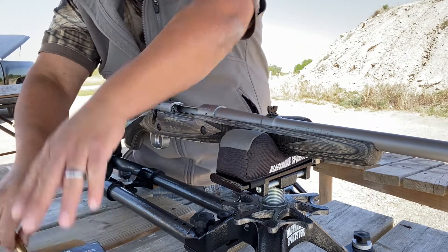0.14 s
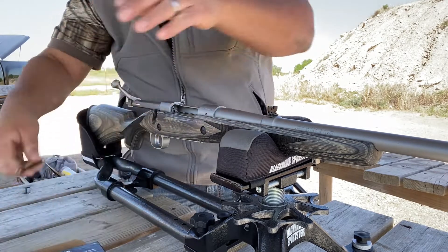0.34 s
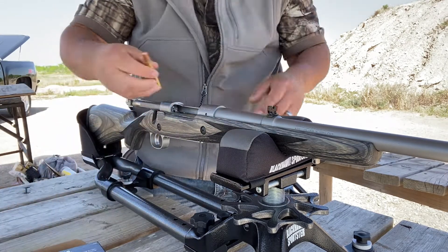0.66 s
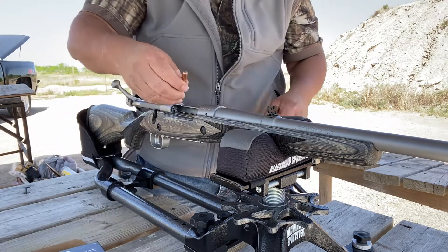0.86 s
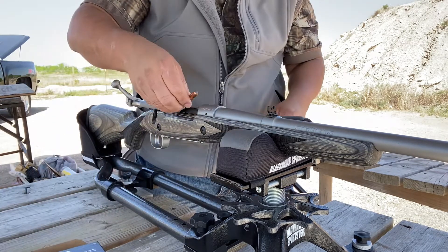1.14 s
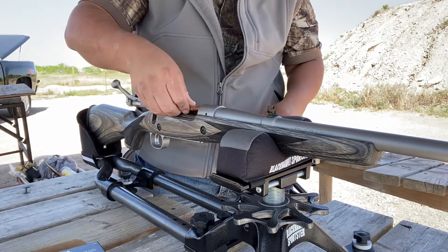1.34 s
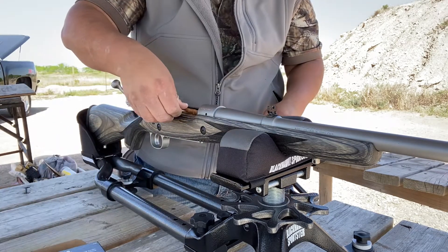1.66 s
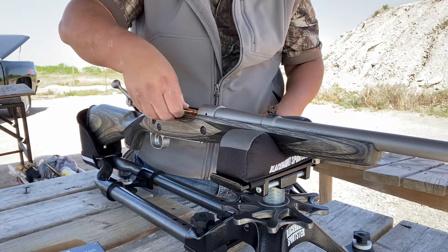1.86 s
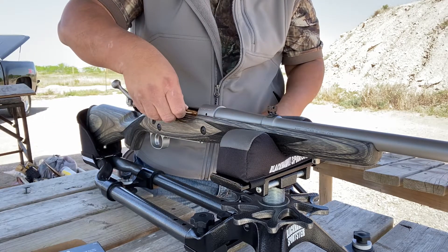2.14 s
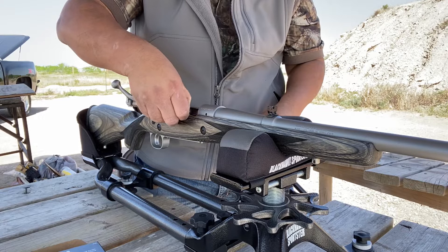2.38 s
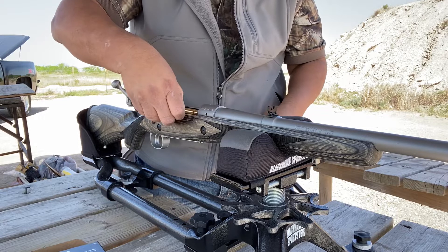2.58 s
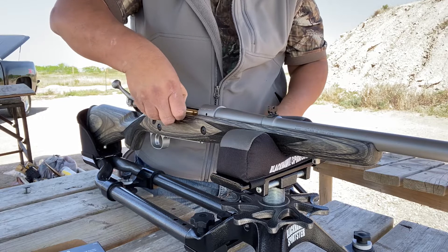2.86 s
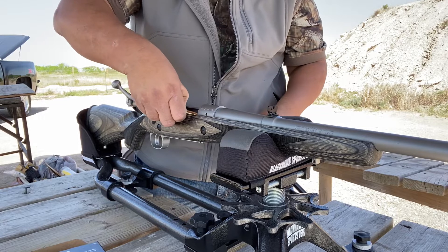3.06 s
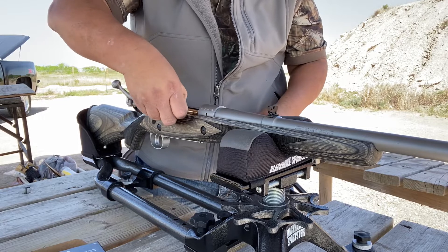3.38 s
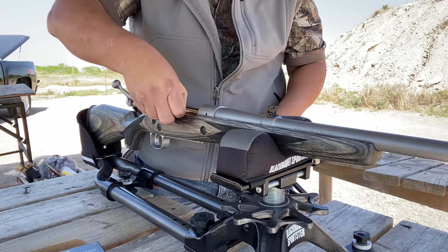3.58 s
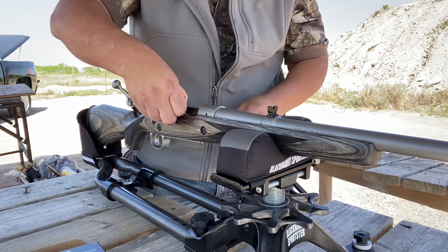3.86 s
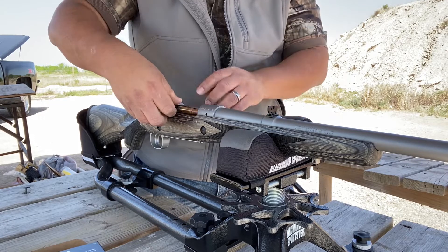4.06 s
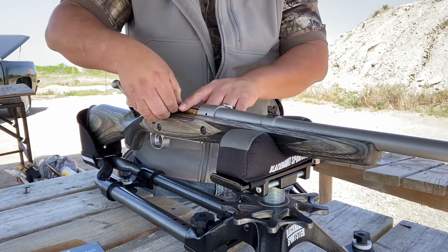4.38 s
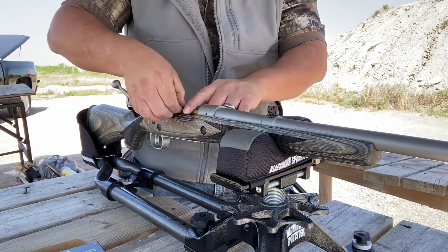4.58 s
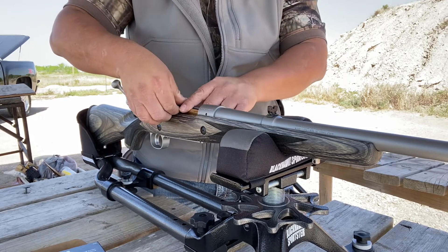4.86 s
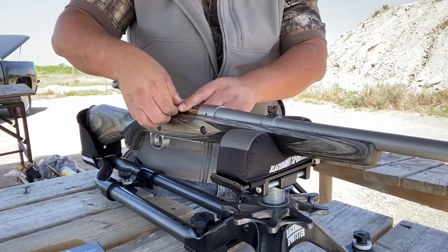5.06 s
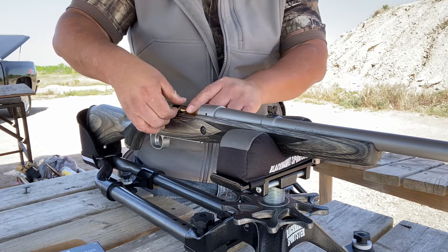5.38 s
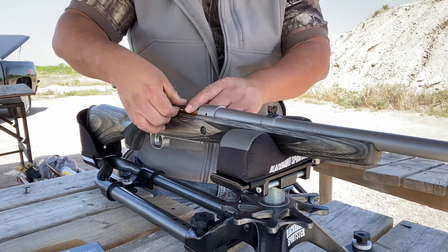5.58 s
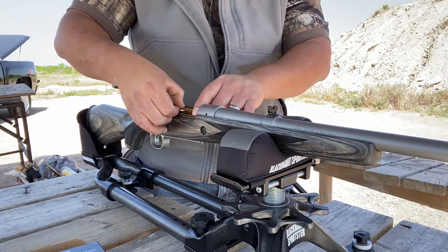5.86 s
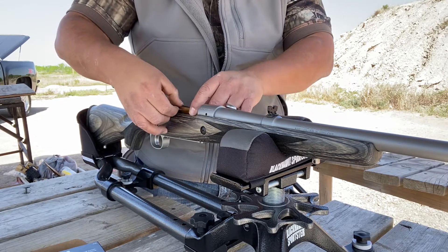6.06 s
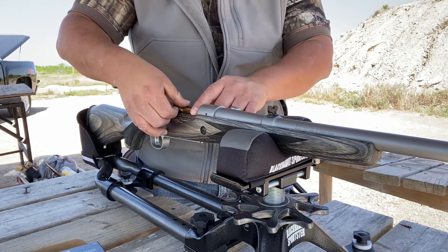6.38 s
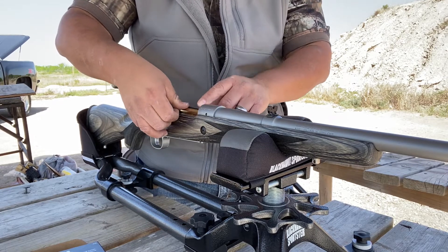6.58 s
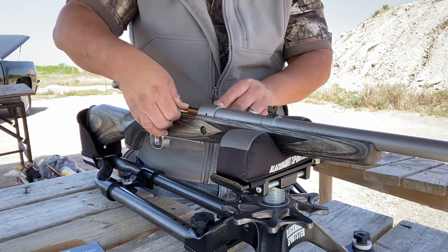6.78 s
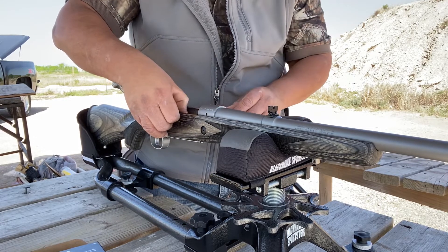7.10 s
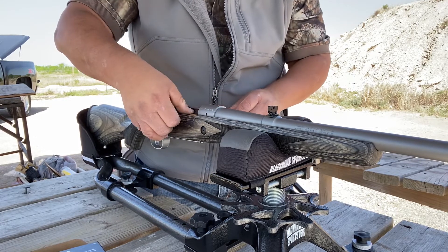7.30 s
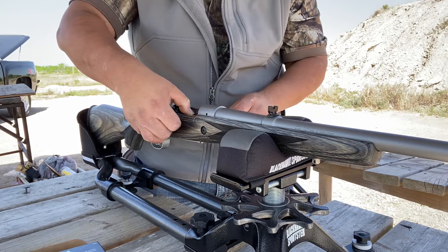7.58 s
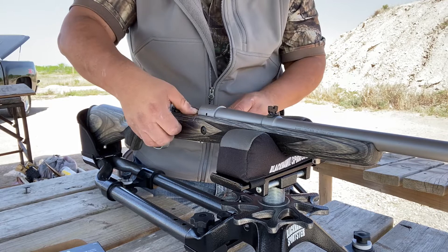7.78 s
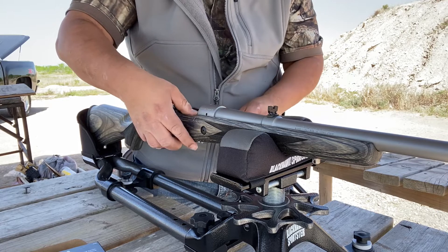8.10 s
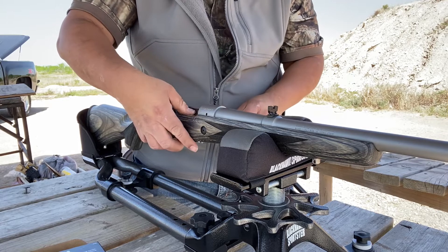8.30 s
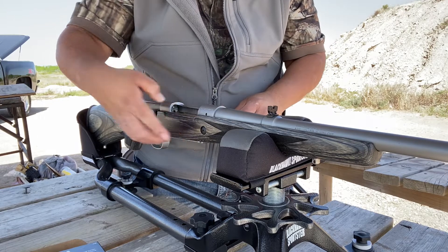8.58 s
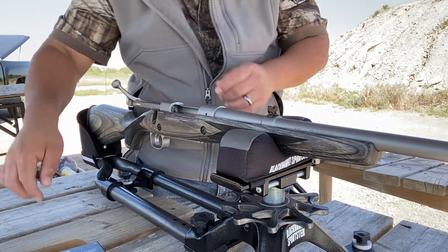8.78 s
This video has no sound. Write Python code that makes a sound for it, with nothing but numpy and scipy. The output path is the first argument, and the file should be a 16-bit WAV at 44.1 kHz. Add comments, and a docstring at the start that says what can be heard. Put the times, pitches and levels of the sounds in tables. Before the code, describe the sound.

Outdoors, close stereo microphone, dry with only a slight scattered reflection. At 0 s a low puff of wind rasps as a light, dull knock lands, followed by faint cloth rubbing. From 1.1 to 1.5 s brass clatters on steel in a quick run of bright clicks, briefly ringing, with short scrapes. A very faint distant bird whistle falls twice near 1.8 s. A strong wind thump and a sharp snap come at 2.3 s, then a double click at 2.55 s. Small ticks at 3.3 s lead to a hard snap at 3.8 s and the loudest clack at 4.0 s, trailing brassy rattles until 4.35 s. From 4.5 to 6.8 s, sparse light ticks and scuffs. Firmer clicks at 6.9 and 7.7 s, a softer tick at 8.03 s, then faint rubbing. Lumpy low wind and faint hiss continue throughout.

```python
"""A puff of wind and a light knock come first; then brass cartridges are pressed into the steel magazine
of a rifle lying in a rest on a wooden bench, outdoors. Each contact is a burst of shaped noise with
decaying sines for action, stock and brass; scrapes and scuffs are filtered noise.
Wind is lumpy low noise with sagging sine puffs on the microphone's two ports; the open country is a faint
hiss, and a far bird is one gliding sine."""
import sys
import numpy as np
from scipy import signal
from scipy.fft import rfft, irfft, next_fast_len
from scipy.io import wavfile
from scipy.ndimage import uniform_filter1d, map_coordinates

SR = 44100
rng = np.random.default_rng(int(sys.argv[2]) if len(sys.argv) > 2 else 0)


def convert_level_to_amplitude(level_db):
    """Map a level in decibels to its linear amplitude factor."""
    exponent = np.asarray(level_db, float) / 20
    return 10 ** exponent


def unload_audio(sound):
    """Save the sound as a 16-bit wav file, at the path given as the first command line argument."""
    columns = np.transpose(np.atleast_2d(sound))
    # keep every value between -1 and 1, then stretch to whole-number steps
    steps = np.round(np.clip(columns, -1, 1) * 32767)
    wavfile.write(sys.argv[1], SR, steps.astype(np.int16))


N = 394254

# modes of the steel action and magazine: pitch_hz, level_db, t60_s
ACTION_MODES = [(1350, -3, .03), (1580, -6, .035), (1775, -3, .035), (2000, -2, .04), (2200, -4, .035),
                (2330, -6, .03), (2700, -6, .025), (3000, -7, .025), (3700, -4, .025), (3950, -4, .022),
                (4400, -6, .022), (5500, -9, .02), (6400, -10, .02)]
# modes of the stock and bench under a blow: pitch_hz, level_db, t60_s
STOCK_MODES = [(840, -3, .03), (1180, -.5, .035)]


def unit(x):
    """Scaled to rms 1."""
    return x / np.sqrt(np.mean(x ** 2) + 1e-20)


def along(points, hz):
    """Interpolates (Hz, value) points on a log frequency axis."""
    f, v = np.transpose(points)
    return np.interp(np.log(hz + 1), np.log(f + 1), v)


def curves(rows):
    """One value per sample for each column after the time."""
    s, *cols = np.transpose(rows)
    return [np.interp(np.arange(N) / SR, s, c) for c in cols]


def wobble(rate):
    """A smooth random curve with rate knots a second."""
    knots = rng.standard_normal(int(N * rate / SR) + 4)
    return map_coordinates(knots, [np.arange(N) * rate / SR])


def filtered(x, response):
    """x times a complex response of frequency."""
    n = x.shape[-1]
    m = next_fast_len(n + 8192)
    return irfft(rfft(x, m) * response(np.fft.rfftfreq(m, 1 / SR)), m)[..., :n]


def coloured(x, spectrum):
    """x shaped by a spectrum in dB, rms 1."""
    return unit(filtered(x, lambda hz: convert_level_to_amplitude(along(spectrum, hz))))


def lay(times, shapes):
    """Rows of shapes summed at their times."""
    at = np.round(np.asarray(times) * SR).astype(int)[:, None] + np.arange(shapes.shape[1])
    return np.bincount(at.ravel(), shapes.ravel(), N + SR)[:N]


def rung(modes, t, count, scatter_db, detune):
    """One row per blow: each mode decays as a sine of new strength, phase and slightly new pitch."""
    out = np.zeros((count, len(t)))
    for hz, db, t60 in modes:
        draw = rng.standard_normal((count, 3))
        phase = 2 * np.pi * hz * (1 + detune * draw[:, :1]) * t + 2 * draw[:, 1:2]
        out += convert_level_to_amplitude(db + scatter_db * draw[:, 2:] - 60 * t / t60) * np.sin(phase)
    return out


def country():
    """Far hiss whose level drifts slightly, only partly alike at the two ports."""
    # hiss of the open country: pitch_hz, relative_level_db_per_hz
    far_colour = [(120, -29.5), (200, -18.5), (451, -22.5), (562, -7), (997, -3.5), (1940, -39.5),
                  (5970, -45.5), (8330, -49.5), (9300, -62.5), (12000, -35), (16500, -60.5)]
    # far noise at the two ports: pitch_hz, likeness (limited to -1..1 below)
    likeness = [(60, 0.81), (130, 0.99), (290, 0.9), (640, -2.7), (1410, 0.94), (3100, -0.49), (6820, 0.4),
                (15000, -0.03)]
    level_db = -63.5

    def split(hz):
        turn = np.arccos(np.clip(along(likeness, hz), -1, 1)) / 2
        return convert_level_to_amplitude(along(far_colour, hz)) * [np.cos(turn), np.sin(turn)]

    mid, side = filtered(rng.standard_normal((2, N)), split)
    return convert_level_to_amplitude(level_db + 1.4 * wobble(1.7)) * unit(np.array([mid + side, mid - side]))


def wind():
    """Eddies over the ports: lumpy low noise, rasping higher up in gusts, with single puffs."""
    # wind on the microphone: time_s, rumble_db, flutter_db, rasp_db
    wind_levels = [(0.0, -34.5, -37.5, -45.5), (0.22, -40.5, -55, -61), (0.94, -40.5, -48.5, -58.5),
                   (1.29, -40, -47.5, -60.5), (1.89, -40.5, -49, -62.5), (2.29, -39, -49, -58.5),
                   (2.96, -47.5, -57.5, -59.5), (3.44, -40.5, -63, -63), (3.81, -45, -58.5, -60.5),
                   (4.03, -39, -48.5, -56), (4.66, -40, -43, -59.5), (4.88, -45, -56, -59.5),
                   (5.88, -44, -51.5, -59.5), (6.57, -46, -57.5, -57), (6.94, -46, -47.5, -62.5),
                   (7.3, -43, -49, -57), (7.47, -42, -47.5, -61.5), (7.67, -40, -50, -54),
                   (8.09, -40, -47, -59.5), (8.94, -45, -55.5, -58.5)]
    # gusts on top of it: peak_s, half_width_s (to 1/e), flutter_rise_db, rasp_rise_db
    gust_list = [(0.031, 0.012, 2, 19), (.14, 0.098, 4, 12.5), (1.27, 0.046, 1.5, 12),
                 (2.16, 0.078, 11.5, 5.5), (2.286, 0.039, 18, 25), (3.02, 0.022, 7, 11),
                 (3.908, 0.011, 23.5, 6.5), (4.01, 0.038, 8, 6), (4.315, .012, 16, 7),
                 (4.646, 0.011, 14.5, 0), (4.81, .025, 13.5, 3.5), (5.43, 0.036, 3, 8.5),
                 (5.57, 0.015, 11, 0), (5.75, 0.033, 10.5, 6.5), (6.63, 0.047, 6, 5),
                 (6.93, 0.084, 7.5, 12), (7.43, 0.031, 7, 12.5), (7.52, 0.028, 9.5, 7),
                 (7.6, 0.064, 12.5, 12.5), (7.7, 0.062, -3, 3.5), (7.82, .05, 9.5, 7),
                 (7.949, 0.021, 11.5, 7), (8.84, .03, 12.5, 8)]
    # strong puffs on the microphone: start_s, level_db, starting_pitch_hz
    puff_list = [(.017, -22.5, 215), (.585, -26, 67), (.72, -36.5, 127), (.768, -33.5, 101), (.96, -35, 72),
                 (1.125, -36, 208), (1.26, -30, 70), (1.416, -29.5, 85), (1.669, -30.5, 139.5),
                 (1.756, -26.5, 78.4), (1.817, -28, 110.5), (1.983, -40, 141.5), (2.1, -31, 70.3),
                 (2.2, -34, 70.5), (2.264, -24.5, 276), (2.289, -13, 157), (2.35, -43, 66.5),
                 (2.475, -34, 116), (2.78, -35.5, 66.7), (3.904, -36, 129), (4.001, -26.5, 174),
                 (4.075, -30.5, 74.8), (4.211, -34, 129), (4.287, -28, 90), (4.46, -32.5, 106),
                 (4.636, -26, 136.6), (4.675, -25, 70), (4.798, -25.5, 86), (5.42, -37.5, 70.4),
                 (5.742, -38, 153), (6.37, -40, 108), (6.627, -32.5, 130.8), (6.9, -26.5, 65.4),
                 (7.03, -26.5, 59.2), (7.369, -35, 126), (7.42, -39.5, 142), (7.52, -31.5, 74.5),
                 (7.61, -32.5, 91), (8.029, -38.5, 100), (8.35, -24, 61.9), (8.712, -37.5, 265),
                 (8.83, -30, 70.5)]
    # noise spectra of the three layers: pitch_hz, relative_level_db_per_hz
    rumble_colour = [(15, -38.5), (26, -7.5), (59, 3), (75, 0), (130, -3.5), (170, -31.5), (290, -120)]
    flutter_colour = [(53, -30), (90, -6.5), (220, -7), (332, -24.5), (421, -30), (450, -35.5),
                      (580, -66.5), (990, -120)]
    rasp_colour = [(180, -34), (300, -0.5), (621, -12), (829, -14.5), (1230, -36.5), (1500, -33.5),
                   (1950, -75), (3300, -120)]
    swell_db, swells_per_s = 1, 11  # the deep rumble swells and sags at random
    # small random puffs: level over the calm flutter, pitch spread in log units
    eddies_per_s, eddy_hz, eddy_spread, eddy_db, eddy_scatter_db = 30, 184, .4, 6, 5
    puff_cycles = 0.84  # cycles to the peak of a puff's envelope

    deep_db, flutter_db, rasp_db = curves(wind_levels)
    calm_db = flutter_db
    for s, width, flutter_up_db, rasp_up_db in gust_list:
        gust = np.exp(-((np.arange(N) / SR - s) / width) ** 2)
        flutter_db = flutter_db + flutter_up_db * gust
        rasp_db = rasp_db + rasp_up_db * gust

    eddy = wobble(22)  # one lumpiness shared by all three layers
    deep_lumps = convert_level_to_amplitude(1.9 * eddy + swell_db * wobble(swells_per_s))
    flutter_lumps = convert_level_to_amplitude(1.5 * eddy + 1.1 * wobble(40))
    rasp_lumps = convert_level_to_amplitude(3.0 * eddy + 3 * wobble(90))
    deep = coloured(deep_lumps * rng.standard_normal(N), rumble_colour)
    flutter = coloured(flutter_lumps * rng.standard_normal(N), flutter_colour)
    rasp = coloured(rasp_lumps * rng.standard_normal(N), rasp_colour)

    draw = rng.standard_normal((270, 2))
    at = (np.arange(len(draw)) + rng.random(len(draw))) / eddies_per_s
    small_db = calm_db[np.minimum(at * SR, N - 1).astype(int)] + eddy_db + eddy_scatter_db * draw[:, 0]
    small = np.c_[at, small_db, eddy_hz * np.exp(eddy_spread * draw[:, 1])]
    s, db, hz = (c[:, None] for c in np.r_[puff_list, small].T)
    turns = hz * np.arange(SR // 12) / SR
    swing = np.sin(2 * np.pi * turns * (1 - 0.031 * turns))  # pitch sags
    puff = convert_level_to_amplitude(db) * swing * turns / puff_cycles * np.exp(1 - turns / puff_cycles)
    return convert_level_to_amplitude(deep_db) * deep + convert_level_to_amplitude(flutter_db) * flutter + convert_level_to_amplitude(rasp_db) * rasp + lay(s[:, 0], puff)


def bird():
    """A thin far whistle, falling twice: one sine with gliding pitch and unsteady level."""
    # bird whistle: time_s, pitch_hz, level_db
    whistle = [(1.79, 3704, -96), (1.81, 3535, -81.5), (1.86, 3384, -83.5), (1.88, 3395, -89),
               (1.9, 3713, -88), (1.92, 3520, -78), (1.96, 3390, -88), (1.98, 3406, -97)]
    hz, db = curves(whistle)
    return convert_level_to_amplitude(db + 2.5 * wobble(62)) * np.sin(2 * np.pi * np.cumsum(hz) / SR)


def yard(x):
    """Scattered answer of bench and ground: decaying noise, different at each port."""
    # decay of the answer: pitch_hz, t60_s
    yard_decay = [(500, 0.16), (2000, 0.18), (8000, 0.04), (15000, 0.16)]
    hz, t, z = signal.stft(rng.standard_normal((2, SR // 3)), SR, nperseg=256)
    fading = z * convert_level_to_amplitude(-60 * t / along(yard_decay, hz)[:, None])
    tail = signal.istft(fading, SR, nperseg=256)[1]
    late = np.pad(x, (130, 0))[None]  # 130 samples, about 3 ms
    return signal.fftconvolve(late, tail / np.linalg.norm(tail[0]), axes=1)[:, :N]


def body(hz):
    """Response of the rifle to rubbing: a resonant peak at each mode of stock and action."""
    peaks = 0
    for centre, db, t60 in [*STOCK_MODES, *ACTION_MODES]:
        loss = 1j * hz * np.log(1000) / (np.pi * t60)
        peaks = peaks + convert_level_to_amplitude(db) * loss / (centre * centre - hz * hz + loss)
    return 1 + convert_level_to_amplitude(6) * peaks


def slide():
    """Cloth, skin and metal rubbing: a soft hiss from all around, unlike at the two ports."""
    # strokes of sleeve, hand or case: start_s, length_s, scrape_db, fizz_db
    stroke_list = [(0, 0.1, -58, -68), (0.08, 0.63, -66.5, -71.5), (.72, .07, -69, -74),
                   (.81, .05, -75, -80), (1.16, 0.087, -50.5, -69), (1.3, 0.13, -66, -76),
                   (1.433, 0.075, -51.5, -67), (2.38, 0.14, -68, -78), (2.564, 0.026, -47, -81),
                   (2.62, 0.091, -59.5, -78), (3.813, 0.3, -65, -70), (4.167, 0.13, -53, -71),
                   (4.305, 0.36, -69, -81), (6.017, .12, -73, -81), (6.553, 0.1, -69.5, -84),
                   (6.739, 0.34, -70, -75), (6.913, 0.029, -54.5, -77), (7.703, 0.24, -72, -78),
                   (8.405, 0.33, -76.5, -84.5), (8.758, .15, -72.5, -78), (8.93, 0.017, -59.5, -65)]
    # scrape, fizz, and the fizz as a difference between the ports: pitch_hz, relative_level_db_per_hz
    scrape_colour = [(530, -39.5), (900, -6.5), (1110, 2), (1450, -4), (1560, 3), (1690, -5.5),
                     (2600, -6.5), (3360, -7.5), (5500, -23.5), (7150, -45.5), (12100, -120)]
    fizz_colour = [(2650, -32.5), (4500, -2), (7340, 0), (8730, -8.5), (9270, -30.5), (9470, -19),
                   (10200, -6.5), (12600, -5), (15800, -22.5), (16500, -31)]
    fizz_apart_colour = [(2650, -33), (4500, -6), (10200, -9), (11300, -18), (11900, -31.5), (12800, -15),
                         (14900, -9.5), (16000, -16), (16500, -39.5)]
    rise_db_per_s, fall_db_per_s = 347, 252.5  # before and after a stroke
    t = np.arange(N) / SR
    scrape, fizz = convert_level_to_amplitude(-79), convert_level_to_amplitude(-87.5)  # the hands are never quite still
    for s, length, scrape_db, fizz_db in stroke_list:
        before, after = np.maximum(s - t, 0), np.maximum(t - s - length, 0)
        stroke = convert_level_to_amplitude(-rise_db_per_s * before - fall_db_per_s * after)
        scrape = np.maximum(scrape, convert_level_to_amplitude(scrape_db) * stroke)
        fizz = np.maximum(fizz, convert_level_to_amplitude(fizz_db) * stroke)
    low, low_apart, high, high_apart = rng.standard_normal((4, N)) * convert_level_to_amplitude(1.1 * wobble(30))
    mid = scrape * coloured(filtered(low, body), scrape_colour) + fizz * coloured(high, fizz_colour)
    scrape_side = convert_level_to_amplitude(-1.1) * scrape * coloured(low_apart, scrape_colour)
    fizz_side = convert_level_to_amplitude(1.5) * fizz * coloured(high_apart, fizz_apart_colour)
    side = scrape_side + fizz_side
    return np.array([mid + side, mid - side])


def scuffs_and_rasp():
    """Each burst is grainy noise in a band coloured by the rifle, swelling and fading over its length."""
    # short bursts of band noise: scuffs of a case or finger, and a low rasp of wind at the start:
    # start_s, level_db, length_s, centre_hz, width (log units)
    burst_list = [(0.035, -30.5, 0.043, 503, 0.47), (0.103, -52.5, 0.056, 3000, 1),
                  (0.125, -51, 0.023, 1130, 0.74), (2.072, -66.5, 0.066, 1600, 0.12),
                  (2.312, -59, 0.038, 2480, 1), (2.495, -46.5, 0.13, 1706, 0.071),
                  (2.505, -56, 0.12, 3930, 0.99), (2.991, -54, 0.03, 1090, 1),
                  (3.032, -47.5, 0.028, 1200, 1), (3.344, -48, 0.078, 1500, 1),
                  (3.762, -54, 0.042, 3020, 1), (3.923, -46, 0.053, 2300, 0.55),
                  (4.423, -59.5, .053, 2410, 0.62), (4.496, -53, 0.051, 2930, 0.46),
                  (4.725, -58.5, 0.024, 1200, 0.86), (5.26, -53.5, 0.02, 3900, 0.17),
                  (5.631, -60.5, 0.1, 1970, 1), (5.863, -66.5, 0.04, 3010, 0.85),
                  (6.181, -58, 0.074, 1480, 0.89), (6.495, -53.5, 0.07, 1416, 1),
                  (6.51, -51.5, 0.032, 3250, 0.17), (6.597, -55.5, 0.02, 2800, .3),
                  (6.893, -43, 0.031, 3000, 0.95), (7.627, -47.5, 0.019, 1150, 0.57),
                  (7.71, -43.5, 0.039, 3200, 0.83), (7.885, -59, 0.042, 3200, 0.49),
                  (7.905, -66, .05, 6000, .07), (8.225, -66, .06, 4000, .8), (8.02, -42, 0.037, 3930, 0.27),
                  (8.021, -51, 0.029, 1800, 0.14)]
    s, db, length, hz, width = (c[:, None] for c in np.transpose(burst_list))
    t = np.arange(SR // 4) / SR
    smooth = uniform_filter1d(rng.standard_normal((len(s), len(t))), size=120)
    grain = convert_level_to_amplitude(4.5 * smooth * np.sqrt(120))
    bell = lambda f: body(f) * np.exp(-(np.log((f + 1) / hz) / width) ** 2)
    band = filtered(grain * rng.standard_normal(grain.shape), bell)
    band = band / band.std(1, keepdims=True)
    return lay(s[:, 0], convert_level_to_amplitude(db) * band * (1 - np.exp(-t / (0.1 * length))) / (1 + (t / length) ** 6))


def contacts():
    """A crunch of noise, the action, the stock and the brass, mixed by where the blow lands."""
    # contacts: start_s, level_db, knock_db, case_ring and hardness (both weighted into dB below)
    contact_list = [(0.018, -25.5, 1.5, -24, -19), (0.056, -45.5, 9.5, -20, -26),
                    (0.145, -47, 14, -20, -35), (.1684, -57.5, 13, -20, -26),
                    (1.1052, -23.5, -24.5, -17.5, -27), (1.1565, -21, -19, -20.5, -20.5),
                    (1.2085, -22.5, -19.5, -7, -21), (1.2398, -17, -16, -9, -17.5),
                    (1.2611, -18, -17, -26.5, -12.5), (1.3521, -29.5, -15, -12, -17.5),
                    (1.4103, -17.5, -12, -4.5, -18.5), (1.418, -19, -18.5, -6, -17),
                    (1.4402, -25, -27, -0.5, -11), (1.4459, -17, -23, -11, -23.5),
                    (1.487, -24.5, -21, -4.5, -24), (1.5022, -31, -14.5, -11, -22.5),
                    (1.5254, -39, -7.5, -22, -41), (1.907, -57.5, -8, -6, -17),
                    (1.9894, -52.5, -5.5, -23, -34), (2.1073, -36, -4, -27, -33),
                    (2.147, -38, -25, -27, -32), (2.3336, -26, -6, -22.5, -19),
                    (2.3421, -9.5, -24.5, -30.5, -15.5), (2.5306, -33, -9, -17.5, -26.5),
                    (2.5735, -14.5, -11.5, -33.5, -11.5), (2.5788, -12.5, -12.5, -20.5, -17.5),
                    (2.5957, -27, -4, -20, -19.5), (2.6705, -23, -16, -14, -20.5),
                    (2.7473, -30.5, -11, -31, -33), (2.987, -48, -15, -25, -34.5),
                    (2.9951, -42, 9.5, -25, -40.5), (3.047, -35, -3, -18, -25),
                    (3.315, -50.5, 1.5, -25.5, -31.5), (3.336, -22, -3, -13.5, -23),
                    (3.374, -31.5, -13, -21.5, -19.5), (3.3818, -20, -12, -16, -21),
                    (3.425, -44, -5.5, -22, -25.5), (3.6486, -30, -13, -22, -36),
                    (3.696, -42, -9.5, -13.5, -38), (3.7775, -29, -15.5, -25, -15.5),
                    (3.7907, -21.5, -16.5, -12, -3.5), (3.7978, -5, -23, -17, -15),
                    (3.8911, -48, -11, -8, -20.5), (3.934, -29.5, -25, -19.5, -21.5),
                    (3.9618, -30, -16.5, -7.5, -15), (3.9754, -22.5, -20.5, -6.5, -13),
                    (3.985, -9, -13, -24.5, -16), (3.9909, -2, -17, -26.5, -13),
                    (3.9979, -9.5, -23.5, -16, -7), (4.145, -25, -30, -16, -15.5),
                    (4.1629, -29.5, -17, -0.5, -24), (4.1982, -23, -10.5, -3, -24.5),
                    (4.2142, -22.5, -19, -18.5, -14.5), (4.234, -22, -27, -1, -30.5),
                    (4.2737, -31, -15.5, -9, -32), (4.2844, -28.5, -16.5, -11, -28.5),
                    (4.3142, -39, -17.5, -30, -34.5), (4.3309, -26, -19, -14, -26.5),
                    (4.5073, -43, -5, -11, -33.5), (4.5353, -44.5, -3.5, -5, -38),
                    (4.5781, -24, -28, -26, -34), (4.7307, -57, 18, -29, -31),
                    (5.1214, -40.5, -14, -7.5, -24), (5.1571, -29.5, -10.5, -21, -21.5),
                    (5.2562, -29.5, -21, -10.5, -26), (5.4545, -46.5, -8.5, -16, -29.5),
                    (5.659, -27, -25, -15, -25.5), (5.9533, -33, -21, -21.5, -26.5),
                    (5.9678, -25.5, -7.5, -11, -29), (6, -26, -20, -18, -18), (6.0302, -36.5, -18, -7, -31),
                    (6.1006, -31, -29, -23, -26.5), (6.193, -58, 14, -24, -35),
                    (6.2195, -35, -22, -14, -21), (6.3984, -37.5, -23, -12, -21),
                    (6.4289, -27.5, -24, -23, -42), (6.4654, -25.5, -25, -17, -22.5),
                    (6.5174, -47.5, -2, -13.5, -29), (6.6021, -54.5, 9.5, -21.5, -43),
                    (6.7278, -42, -26, -24, -28), (6.8498, -44, -24, -30, -40),
                    (6.8982, -20.5, -20, -10, -19.5), (6.91, -30.5, -9, -16.5, -26),
                    (6.947, -20.5, -26, -24, -15), (6.99, -48, -14, -22.5, -29),
                    (7.0668, -46, -8, -22, -31), (7.1557, -47.5, -9, -20, -35), (7.183, -48, -13, -23, -35),
                    (7.2, -46.5, -10, -21.5, -33), (7.2247, -41.5, -12, -20, -31),
                    (7.4842, -52, -4, -12, -21), (7.5896, -49.5, -10, -22, -37),
                    (7.7207, -21, -14.5, -17, -16), (7.8174, -57, -16, -15, -31),
                    (8.0309, -33, -17, -22, -21), (8.1881, -54, -4, -20, -27),
                    (8.2096, -37, -11.5, -22, -27), (8.4203, -58, -3, -24, -36)]
    # crack, sizzle of thin steel lips, thud in stock and bench: pitch_hz, relative_level_db_per_hz
    crack_colour = [(500, -28.5), (1200, -7), (3000, 6.5), (6000, -1), (9000, -5.5), (12000, -23),
                    (17000, -39)]
    sizzle_colour = [(6000, -26), (9000, -1), (11500, 3.5), (14000, -14), (16000, -11.5), (17500, -30)]
    thud_colour = [(200, -30), (450, -11), (850, 0), (1200, -4), (1800, -13), (3000, -48)]
    # modes of the brass case, body and neck: pitch_hz, level_db, t60_s
    case_modes = [(3375, -.5, .08), (3450, -8, .05), (8035, -14, .09)]
    neck_modes = [(8025, -21, .1), (8135, -.5, .02)]
    rise_s = 0.00091  # a contact builds up over this time
    onset_s, onset_db = 0.0036, -24.5  # a faint noise swells for a few milliseconds before each contact
    soft_hz, hardness_per_octave = 40000, 15  # crack corner at hardness 0, an octave lower per 15 below

    s, db, knock_db, case_ring, hardness = (c[:, None] for c in np.transpose(contact_list))
    t = np.arange(SR // 8) / SR
    n = len(s)
    noise = lambda: rng.standard_normal((n, len(t)))
    crunch = lambda colour: coloured(noise(), colour)

    snap = convert_level_to_amplitude(-60 * t / 0.024) + convert_level_to_amplitude(-17 - 60 * t / 0.1)  # the snap, then chatter of loose parts
    # a contact is a quick run of uneven small touches
    snap = snap * convert_level_to_amplitude(4 * unit(uniform_filter1d(noise(), size=50)) - 2.0)
    corner_hz = soft_hz * 2 ** (hardness / hardness_per_octave)
    crack = filtered(crunch(crack_colour), lambda f: 1 / (1 + (f / corner_hz) ** 2))
    sizzle_fade = convert_level_to_amplitude(-60 * t / 0.013) + convert_level_to_amplitude(-26 - 60 * t / 0.045)
    sizzle = convert_level_to_amplitude(hardness + 11.0) * crunch(sizzle_colour) * sizzle_fade
    action = convert_level_to_amplitude(-15.5) * rung(ACTION_MODES, t, count=n, scatter_db=5, detune=.025)
    thud = convert_level_to_amplitude(knock_db - 60 * t / 0.068) * unit(filtered(crunch(thud_colour), body))
    stock = convert_level_to_amplitude(knock_db - 9) * rung(STOCK_MODES, t, count=n, scatter_db=0.5, detune=0.014)
    blow = convert_level_to_amplitude(-3.0) * crack * snap + sizzle + action + thud + stock

    # brass rings only where it is free: strong contacts on it ring much more than weak ones
    case = convert_level_to_amplitude(1.8 * case_ring + 4.5) * rung(case_modes, t, count=n, scatter_db=-3.3, detune=0.0094)
    neck_db = 1.1 * hardness + 0.37 * case_ring + 15.5
    neck = convert_level_to_amplitude(neck_db) * rung(neck_modes, t, count=n, scatter_db=4.5, detune=0.0016)
    rattle = convert_level_to_amplitude(0.93 * unit(uniform_filter1d(noise(), size=130)))  # a loose case buzzes on its seat
    # seconds until the next touch or the thumb damps it
    free = np.minimum(np.diff(s, axis=0, append=N / SR), .03)
    brass = (case + neck) * rattle * np.exp(-np.maximum(t - free, 0) / .012)

    early = t[:SR // 60]
    onset_noise = (crunch(crack_colour) + convert_level_to_amplitude(hardness + 11) * crunch(sizzle_colour))[:, :len(early)]
    onset_noise = convert_level_to_amplitude(db + onset_db) * onset_noise * np.exp((early - early[-1]) / onset_s)
    hit = convert_level_to_amplitude(db) * (blow + brass) * (1 - np.exp(-(t / rise_s) ** 2))
    return lay(s[:, 0] - early[-1], onset_noise) + lay(s[:, 0], hit)


def ports(x):
    """A near source reaches the two ports with a lag and shading that change with pitch."""
    # phase between the ports: pitch_hz, left_lead_radians
    port_lead = [(0, -6.5), (520, 1.18), (1120, 0.76), (2410, -1.76), (3360, -1), (4820, -1.55),
                 (5860, -1.5), (7750, -1.5), (9250, -3), (10500, -4.5), (12000, -0.5), (13200, -7.5),
                 (14700, -9.5), (16500, -14.5)]
    # level between the ports: pitch_hz, left_minus_right_db
    port_lean = [(60, 0.5), (110, 0), (200, -1.5), (380, 0.0), (700, 0), (1290, 2), (2380, -0.5),
                 (4400, -0.5), (8120, 3), (15000, -2.5)]
    sign = np.array([[.5], [-.5]])
    lead = lambda hz: np.interp(hz, *np.transpose(port_lead))
    return filtered(x, lambda hz: convert_level_to_amplitude(sign * along(port_lean, hz)) * np.exp(1j * sign * lead(hz)))


def scene():
    """Rifle near, country far, wind on both ports alike."""
    rifle = contacts() + scuffs_and_rasp()
    near = rifle + convert_level_to_amplitude(-12.0) * yard(rifle)[0] + bird()
    # a second draw of contact noise, opposite in sign at the two ports, widens the sound
    widening = convert_level_to_amplitude(-13.5) * contacts() * [[1], [-1]]
    return ports(near) + widening + convert_level_to_amplitude(-20.5) * yard(rifle) + slide() + country() + wind()


def top_cut(x):
    """Nothing passes above the cut-off."""
    return signal.sosfilt(signal.butter(12, 16640, fs=SR, output="sos"), x)


def record(dry):
    """The recorder clips softly, cuts the lowest bass and the top treble, and sums the bass to mono."""
    top_hz, bass_hz, mono_hz = 16500, 32, 330
    soft = .9 * dry / (1 + np.abs(dry) ** 8) ** (1 / 8)
    soft = filtered(soft, lambda hz: (hz < top_hz) / (1 + (bass_hz / (hz + 1)) ** 6))
    mid = soft.mean(0)
    side = filtered(soft[0] - mid, lambda hz: 1 / (1 + (mono_hz / (hz + 1)) ** 12))
    return top_cut(np.array([mid + side, mid - side]))


dry = scene()
out = record(dry)
unload_audio(out)
```